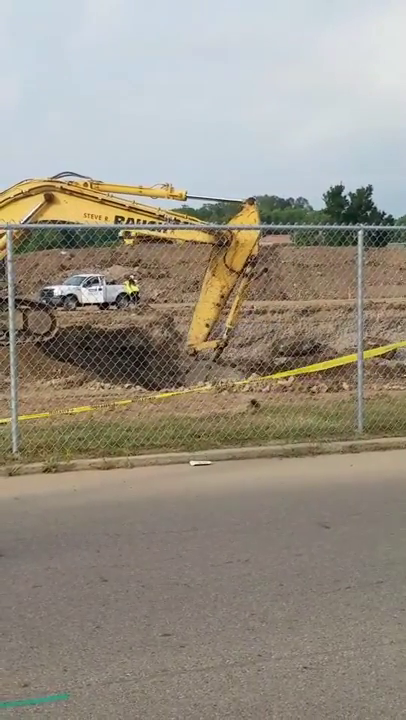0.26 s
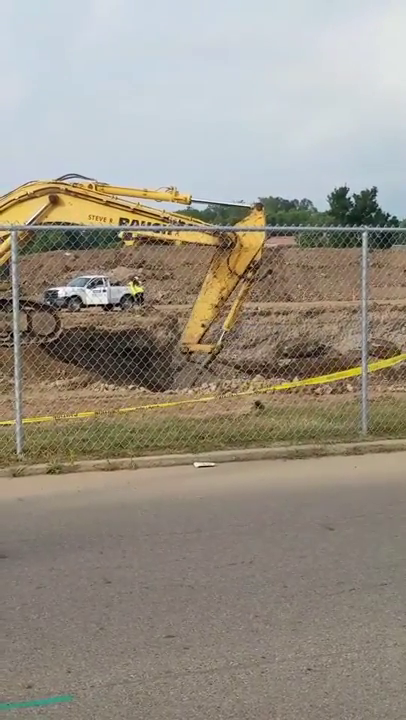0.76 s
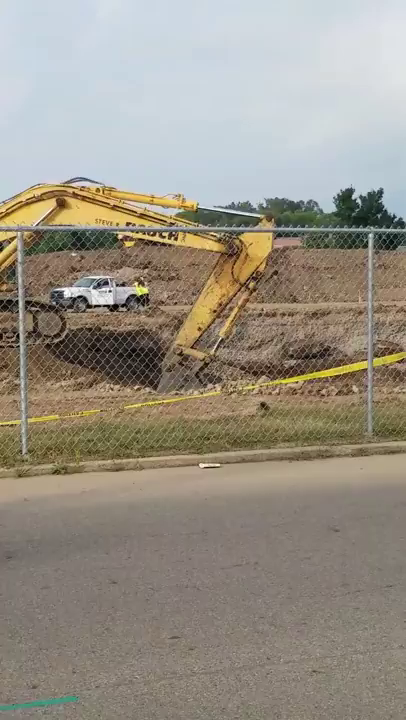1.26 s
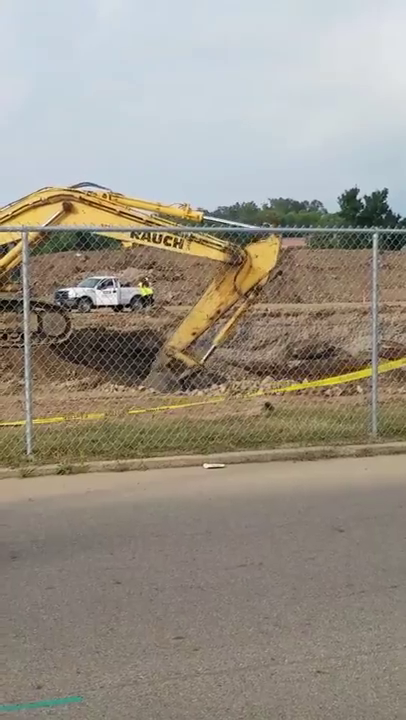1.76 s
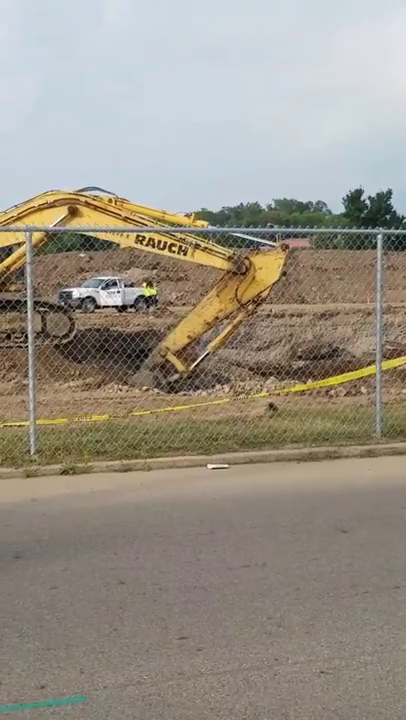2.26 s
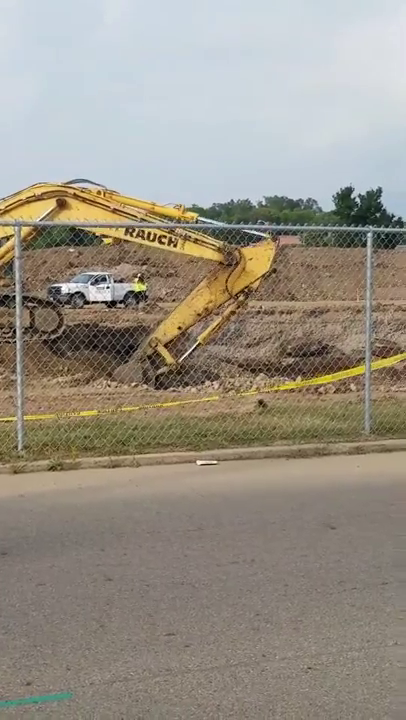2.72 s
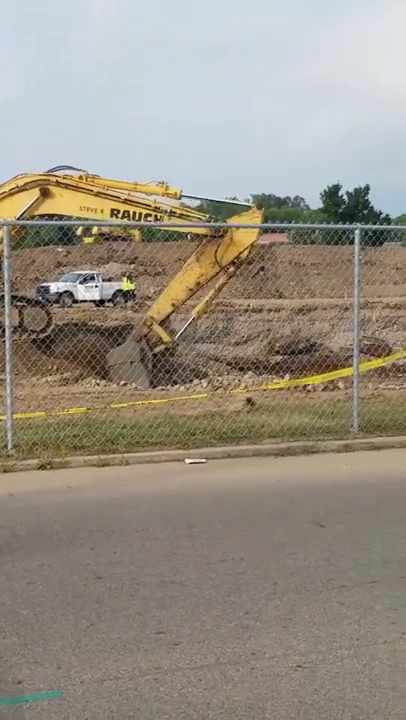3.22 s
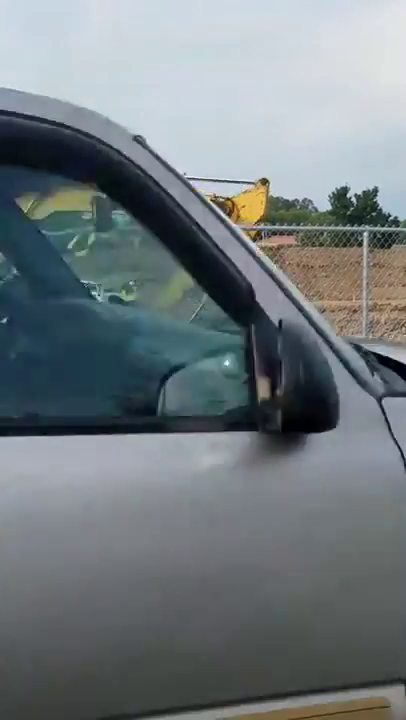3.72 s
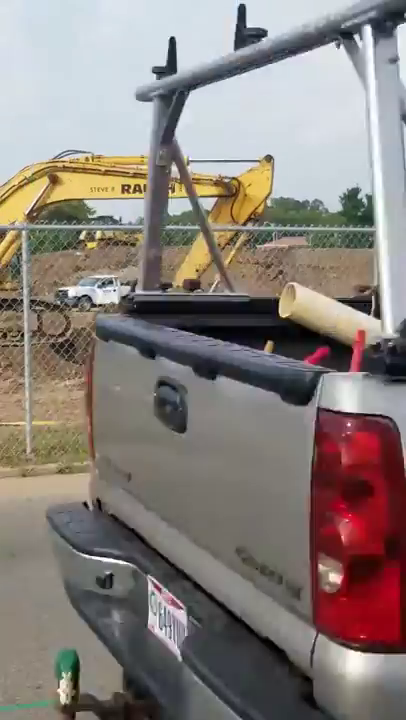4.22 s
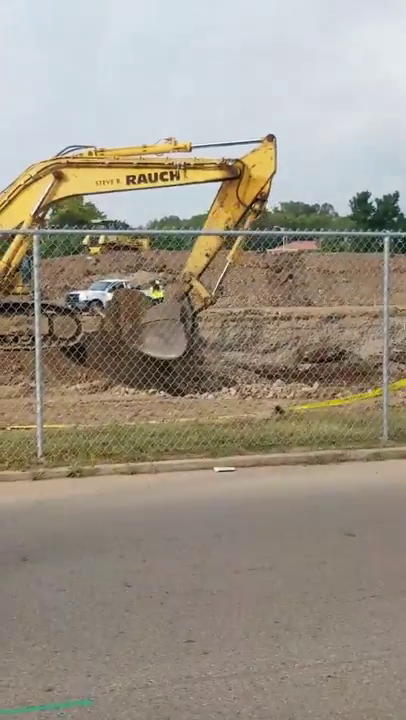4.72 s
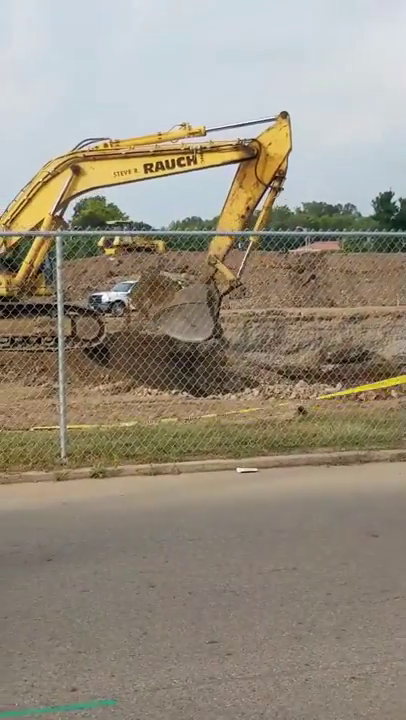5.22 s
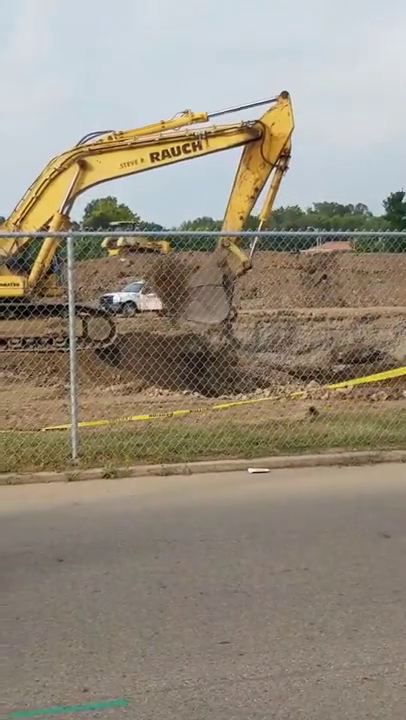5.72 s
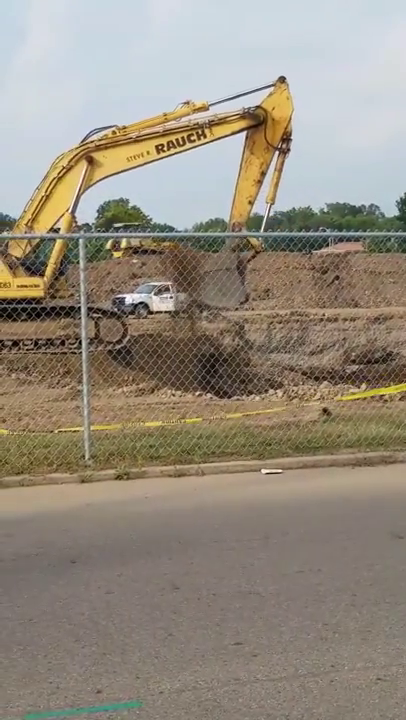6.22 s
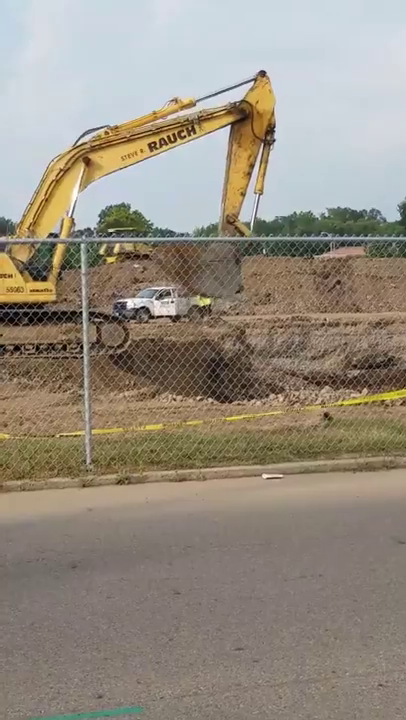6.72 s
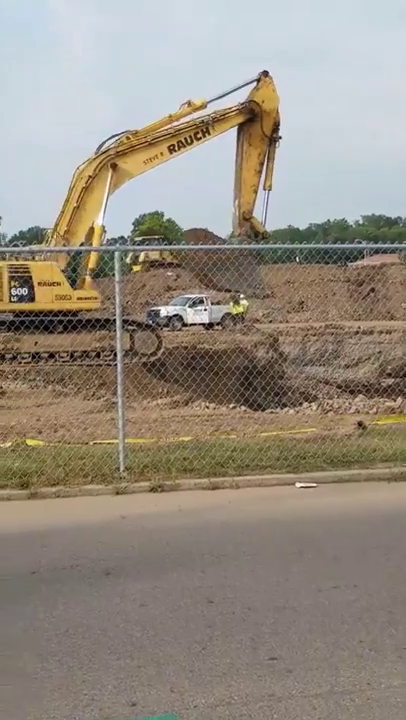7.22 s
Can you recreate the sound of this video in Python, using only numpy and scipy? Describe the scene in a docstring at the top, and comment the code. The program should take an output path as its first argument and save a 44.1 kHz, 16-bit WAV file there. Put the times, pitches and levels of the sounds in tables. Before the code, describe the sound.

Outdoors by a road, a large diesel excavator dominates with a loud, nearly pure low drone, plus fan roar, faint knock and oil hiss. Breeze rumbles on the microphone. The engine sags, then surges as its load frees. A pickup passes very close from left to right, its tyres roaring on coarse asphalt and briefly masking the machine. Afterwards the drone returns softer, with brighter roar and hiss.

```python
"""From the start a big diesel excavator digs behind a fence: its exhaust drones on one low note over fan
roar, knock, turbo and hydraulics; a second engine hums farther off and a breeze rumbles on the microphone.
Freed of its load the engine surges, then a pickup rolls by a few steps away and screens the machine for
a moment, while the upper body swings round; later comes one faint tick.
Tones are summed sines that waver; roars and hisses are coloured noise; whistles are narrow noise bands."""
import sys
import numpy as np
from scipy import signal
from scipy.fft import rfft, irfft, next_fast_len
from scipy.io import wavfile
from scipy.ndimage import uniform_filter1d

SR = 44100
rng = np.random.default_rng(int(sys.argv[2]) if len(sys.argv) > 2 else 0)


def wav_out(sig):
    """Save sig, one row per channel (or a flat mono array), as 16-bit PCM at SR to the path in sys.argv[1]."""
    wavfile.write(sys.argv[1], SR, np.round(np.clip(np.atleast_2d(sig).T, -1, 1) * 32767).astype(np.int16))


N = 329427
TIME = np.arange(N) / SR


def from_db(db):
    """Decibels to gain."""
    return 10 ** (np.asarray(db) / 20)


def rms_one(x):
    """Scale to unit power."""
    return x / np.sqrt(np.mean(x ** 2) + 1e-20)


def in_time(rows):
    """Each column of a curve table at every sample."""
    time_s, *columns = np.transpose(rows)
    return [np.interp(TIME, time_s, column) for column in columns]


def at_hz(points, hz):
    """Read a table on a log-frequency axis."""
    known_hz, values = np.transpose(points)
    return np.interp(np.log(hz + 1), np.log(known_hz), values)


def pan(left_db):
    """Gains of the two channels, left_db apart; negative leans right."""
    return from_db(np.array([[left_db], [-left_db]]) / 2)


def swell(at_s, half_length_s):
    """A smooth bump of height 1, down to 1/e at the half length."""
    return np.exp(-((TIME - at_s) / half_length_s) ** 2)


def drift(rate_hz):
    """Slow chance of spread 1: noise smoothed twice."""
    step = 40  # samples between slow values
    pole = np.exp(-2 * np.pi * rate_hz * step / SR)
    chance = rng.standard_normal(N // step + 2002)
    # the first 2000 values let the smoothing settle
    slow = signal.lfilter([1], [1, -2 * pole, pole * pole], chance)[2000:]
    return np.interp(np.arange(N) / step, np.arange(len(slow)), rms_one(slow))


# how alike the two microphone channels hear a wide sound: hz, likeness (0 to 1)
LIKENESS = [(60, 0.69), (200, 0.92), (400, 0.93), (1300, 0.81), (2400, 0.59), (4400, 0.099), (7000, 0),
            (15000, 0)]


def noise(spectrum, likeness=LIKENESS):
    """Stereo noise of a given colour, its channels as alike at each pitch as the likeness says; rms 1."""
    size = next_fast_len(N, True)
    hz = np.arange(size // 2 + 1) * SR / size
    mid, side = rfft(rng.standard_normal((2, size)))
    alike = np.clip(at_hz(likeness, hz), -1, 1)
    both = np.sqrt(1 + alike) * mid + np.sqrt(1 - alike) * side * [[1], [-1]]
    # beyond its first and last points the spectrum falls away
    below = 1 + (.7 * spectrum[0][0] / (hz + 1)) ** 6
    above = 1 + (.7 * hz / spectrum[-1][0]) ** 6
    colour = from_db(at_hz(spectrum, hz)) / np.sqrt(below * above)
    return rms_one(irfft(both * colour, size)[:, :N])


def whistle(hz, width_hz):
    """A narrow band of turbulence around a centre that may move; rms 1."""
    white = rng.standard_normal((2, 2, N))
    lowpass = signal.butter(2, width_hz / 2, fs=SR, output="sos")
    in_phase, quadrature = signal.sosfilt(lowpass, white)
    angle = 2 * np.pi * np.cumsum(hz * np.ones(N)) / SR
    return rms_one(in_phase * np.cos(angle) + quadrature * np.sin(angle))


GROUND_DELAY_S, GROUND_SHARE = 0.00066, 0.24


def off_the_ground(x, dull_hz):
    """A dull ground echo just behind the direct sound carves notches into it; rms 1."""
    dull = signal.sosfiltfilt(signal.butter(1, dull_hz, fs=SR, output="sos"), x)
    echo = np.array([np.interp(TIME - GROUND_DELAY_S, TIME, channel) for channel in dull])
    return rms_one(x + GROUND_SHARE * echo)


# the governed speed in firings per s, and its sag while digging and further with the bucket full
GOVERNED_HZ, DIG_SAG_HZ, FULL_SAG_HZ = 166.5, 1.0, 3.1
# the bucket bites deeper, starts to break out of the soil, and is free
BITE_S, BREAKOUT_S, FREE_S = 1.6, 2.65, 3.0
# the overshoot once free; the governor's hunting, at all times but the heaviest load, most after release
SURGE_HZ, SETTLE_S, HUNT_HZ, SURGE_HUNT_HZ, HUNT_PERIOD_S = 3.0, 1.0, .75, 1.5, .74


def engine_speed():
    """Firings per second: load drags the engine down, release lets it overshoot, the governor hunts."""
    digging = np.interp(TIME, [BREAKOUT_S, FREE_S], [1, 0])
    filling = np.interp(TIME, [BITE_S, BREAKOUT_S], [0, 1])
    sag = digging * (DIG_SAG_HZ + FULL_SAG_HZ * filling)
    surge = (1 - digging) * np.exp(-np.maximum(TIME - FREE_S, 0) / SETTLE_S)
    hunt_depth = HUNT_HZ * (1 - digging * filling) + SURGE_HUNT_HZ * surge
    hunt = hunt_depth * np.cos(2 * np.pi * (TIME - FREE_S) / HUNT_PERIOD_S)
    return GOVERNED_HZ - sag + SURGE_HZ * surge + hunt


# the upper body swings round: start_s, end_s
SWING_S = (3.6, 4.7)


def swung():
    """How far the upper body has turned, 0 to 1."""
    return np.interp(TIME, SWING_S, [0, 1])


# exhaust note while digging, then while lifting, before shadow and flutter: time_s, level_db
DRONE_DIGGING = [(0.22, -7.5), (0.79, -7.5), (2.4, -8), (3.04, -10), (3.3, -15)]
DRONE_LIFTING = [(4.4, -15), (5.44, -15.5), (6.3, -13), (7.4, -15)]
# parts of the pickup that block the exhaust note: middle_s, half_length_s, loss_db
SHADOWS = [(3.545, 0.12, -7), (3.867, 0.084, -15), (4.307, 0.051, -3.5)]
# exhaust overtones from the second up, at governed speed:
# digging_level_db, swung_level_db, gain_db_per_hz (of engine speed)
OVERTONES = [(-33.5, -33.5, 0.4), (-46, -40.5, 1.5), (-45, -39.5, 0.9)]


def exhaust(turns, firing_hz, flutter_db=0.82, waver_rad=0.03,
            overtone_flutter_db=1.0, scatter_rad=0.12, overtone_shadow_db=-14):
    """Firing pulses boom almost as a pure sine; moving air wavers the overtones; the pickup shadows both."""
    drone_db, = in_time(np.vstack([DRONE_DIGGING, DRONE_LIFTING]))
    shadow_db = sum(db * swell(at_s, half_s) for at_s, half_s, db in SHADOWS)
    note_db = drone_db + shadow_db + flutter_db * drift(14)
    note = from_db(note_db) * np.cos(2 * np.pi * turns + waver_rad * drift(12))

    hidden_db = overtone_shadow_db * swell(at_s=3.86, half_length_s=0.24)
    for multiple, (digging_db, swung_db, db_per_hz) in enumerate(OVERTONES, 2):
        facing_db = digging_db + swung() * (swung_db - digging_db)
        level_db = facing_db + db_per_hz * (firing_hz - GOVERNED_HZ) + hidden_db
        angle = 2 * np.pi * multiple * turns + scatter_rad * drift(4.5)
        note = note + from_db(level_db + overtone_flutter_db * drift(3.7)) * np.cos(angle)
    return np.sqrt(2) * note * pan(-.9)  # the root makes the levels rms


# colour of the exhaust boom: hz, relative_db
BOOM = [(25, -33.5), (55, -17), (90, -10), (200, -2), (300, 0), (360, -5.5), (430, -18), (800, -48.5)]
BOOM_DB = -27  # while digging, before drift and screening


def exhaust_boom(swung_boom_db=-1.1):
    """Turbulent gas leaving the stack, heard almost alike in both channels."""
    level_db = BOOM_DB + swung_boom_db * swung() + 0.81 * drift(6.6)
    return from_db(level_db) * noise(BOOM, likeness=[(80, 0.91), (300, 1.0)])


# colour of the fan and block before the ground echo: hz, relative_db
ROAR = [(200, -20), (330, 1.5), (430, 0.5), (620, 3.5), (760, -6), (900, -0.5), (1150, -2.5), (1400, -5),
        (1700, -10), (2300, -10), (3000, -18.5), (4400, -20.5), (6000, -35.5), (9000, -48)]


def machine(turns, roar_db, knock=.11, knock_hz=1400, uneven=.3, patchy_db=0.66):
    """Fan and block roar; above the knock edge it pulses with each firing of six unequal cylinders."""
    roar = off_the_ground(noise(ROAR), dull_hz=3380) * from_db(patchy_db * drift(28))
    bright = signal.sosfiltfilt(signal.butter(2, knock_hz, "high", fs=SR, output="sos"), roar)
    strengths = 1 + uneven * rng.standard_normal(size=6)
    cylinder = strengths[turns.astype(int) % 6]
    knocking = knock * cylinder * np.sin(2 * np.pi * turns) * bright
    return from_db(roar_db) * (roar + knocking) * pan(-2.3)


# bands in which the engine housing resonates, levels against the roar level:
# pitch_hz, width_hz, digging_db, swung_db
HOUSING = [(883.5, 136, -8, -8), (1106, 280, -20.5, -6), (2390, 160, -29, -33)]


def housing(roar_db):
    """Panels and louvres colour the roar; the colour changes as the upper body swings round."""
    out = 0
    for hz, width_hz, digging_db, swung_db in HOUSING:
        facing_db = digging_db + swung() * (swung_db - digging_db)
        out = out + from_db(roar_db + facing_db) * whistle(hz, width_hz)[0]
    return out * pan(-.8)


# colour of the oil hiss: hz, relative_db
HISS = [(2500, -8.5), (4500, 4), (6300, -1), (7400, -4.5), (8700, 0.5), (10100, -3), (11100, 0.5),
        (12600, -0.5), (14300, 2), (15800, -1)]
# oil squeezing through a valve: middle_s, half_length_s, pitch_hz, width_hz, level_db (before screening)
VALVES = [(1.74, .4, 9070, 600, -53.5), (5.8, 0.41, 3900, 590, -50), (7.1, .3, 10000, 1600, -58),
          (7.2, 0.48, 6800, 500, -55)]


def hydraulics(hiss_db, trim_db=6.0, turned_away_db=-3.5, beam_hz=11000):
    """Oil hiss rises and falls with the work, its very top beamed away in the swing; valves rush narrowly."""
    hiss = noise(HISS)
    top = signal.sosfiltfilt(signal.butter(4, beam_hz, "high", fs=SR, output="sos"), hiss)
    beamed = hiss + (from_db(turned_away_db * swung()) - 1) * top
    out = from_db(hiss_db + trim_db) * beamed
    for at_s, half_s, hz, width_hz, db in VALVES:
        out = out + from_db(db) * swell(at_s, half_s) * whistle(hz, width_hz)
    return out * pan(-.5)


# turbocharger whistle before flutter: time_s, level_db
TURBO = [(0, -55.5), (1.1, -53), (2.0, -60.5), (2.8, -63.5), (4.0, -63), (5.5, -62), (6.3, -61), (7.4, -57)]
# the turbine spools up to its working pitch, and rises when the smoothed engine speed passes governed
TURBO_HZ, SPOOL_HZ, SPOOL_S, TURBO_HZ_PER_HZ, TURBO_SMOOTH_S = 14635, 420, 1.4, 45, .74


def turbo(firing_hz, flutter_db=-0.5, lower_db=-13.0):
    """A thin whistle climbs as the turbine spools up, with a fainter order at three quarters of its pitch."""
    level_db, = in_time(TURBO)
    drive_hz = uniform_filter1d(firing_hz - GOVERNED_HZ, size=int(TURBO_SMOOTH_S * SR))
    spooling_hz = TURBO_HZ - SPOOL_HZ * np.exp(-TIME / SPOOL_S)
    hz = spooling_hz + TURBO_HZ_PER_HZ * np.maximum(drive_hz, 0)
    tones = whistle(hz, width_hz=80) + from_db(lower_db) * whistle(hz * 3 / 4, width_hz=100)
    return from_db(level_db + flutter_db * drift(6)) * tones


# second engine, farther off, before flutter: time_s, firing_level_db, octave_level_db
FAR_ENGINE = [(0, -33.5, -50.5), (2.1, -30.5, -45.5), (3.6, -49.5, -42.5), (4.2, -49, -36),
              (6.0, -45, -32.5), (6.9, -36, -34)]
FAR_FIRING_HZ = 88.4


def far_engine(flutter_db=2.5):
    """Another diesel at nearly constant speed; its firing tone and the octave above carry this far."""
    low_db, high_db = in_time(FAR_ENGINE)
    angle = 2 * np.pi * np.cumsum(FAR_FIRING_HZ + .25 * drift(2.7)) / SR
    low = from_db(low_db + flutter_db * drift(5)) * np.sin(angle)
    high = from_db(high_db + flutter_db * drift(3)) * np.sin(2 * angle)
    return np.sqrt(2) * (low + high)


# colour of wind rumble on the microphone: hz, relative_db
WIND = [(18, -22.5), (35, -10), (60, -2.5), (100, 2.5), (160, -3.5), (250, -5.5), (400, -24), (900, -44)]
# gusts before their lumps: strongest_s, half_length_s, level_db
GUSTS = [(0.767, 0.17, -22), (1.35, 0.2, -25), (1.97, 0.33, -20.5), (2.655, 0.3, -18), (3.673, 0.067, -33),
         (4.338, 0.29, -31.5), (5.54, 0.22, -27), (6.984, .16, -31)]
# the light air between gusts: level at first, and its fall
LULL_DB, LULL_FALL_DB_PER_S = -30.5, 0.93
THUMP_S, THUMP_DB = 2.6, -14


def breeze(lumpy_db=1.0, eddy_db=2.0):
    """Gusts rise from light air, eddies buffet each microphone port; the strongest lands with a thump."""
    lull = from_db(LULL_DB - LULL_FALL_DB_PER_S * TIME)
    flow = lull + sum(from_db(db) * swell(at_s, half_s) for at_s, half_s, db in GUSTS)
    # eddies shared by both ports, and lumps at each port alone
    lumps_db = eddy_db * drift(7.4) + lumpy_db * np.array([drift(12), drift(21)])
    thump = from_db(THUMP_DB) * swell(THUMP_S, half_length_s=0.009)
    force = flow * from_db(lumps_db) + thump
    return force * noise(WIND, likeness=[(30, 0.0081), (300, 0.084)]) * pan(1.0)


# colours of tyre roar and tyre hiss: hz, relative_db
TYRES = [(50, -15.5), (120, -2), (300, -8.5), (500, 1.5), (750, -1), (950, -0.5), (1400, -6.5), (2000, -14),
         (3000, -17.5), (5000, -30), (9000, -49.5)]
TYRE_HISS = [(1500, 0), (3000, 5.5), (5000, 6), (7000, 0), (10000, -5.5), (15800, 1)]
# the pickup's axles, levels when nearest before flutter and sweep:
# nearest_s, half_length_s, roar_level_db, hiss_level_db
PICKUP = [(3.472, 0.5, -26.5, -39.5), (4.138, 0.5, -27.5, -46)]


def pickup(sweep_db=1.0, lag_s=0.00019, coarse_db=1.64):
    """Front and rear axle each swell and fade with distance, their treads drumming on coarse asphalt."""
    # from close by and low down the sound reaches one microphone port later than the other
    left_time = TIME - lag_s * swell(at_s=3.97, half_length_s=0.76)
    out = 0
    for at_s, half_s, roar_db, hiss_db in PICKUP:
        along = (TIME - at_s) / half_s
        nearness = 1 / np.sqrt(1 + along ** 2)
        tread = noise(TYRES, likeness=[(300, .93), (5000, 0.55)])
        roar = from_db(roar_db + coarse_db * drift(32)) * nearness ** 1.72 * tread
        # the hiss is beamed sideways and so dies away faster than the roar
        sizzle = noise(TYRE_HISS, likeness=[(2000, 0.53), (9000, .15)])
        hiss = from_db(hiss_db) * nearness ** 2.9 * sizzle
        # it crosses from left to right
        sweep = from_db(sweep_db * along * nearness * np.array([[-1], [1]]))
        left, right = (roar + hiss) * sweep
        out = out + np.array([np.interp(left_time, TIME, left), right])
    return out


def pickup_fan(level_db=-24.0):
    """The radiator fan whooshes briefly, as a band of turbulence, as the grille goes by."""
    return from_db(level_db) * swell(at_s=3.49, half_length_s=0.025) * whistle(hz=986, width_hz=270)


def tick(level_db=-41):
    """One faint, very high tick: a very short burst of band noise."""
    return from_db(level_db) * swell(at_s=6.039, half_length_s=.002) * whistle(hz=13400, width_hz=4000)


# the machine's work, before the roar and hiss trims and the screening: time_s, roar_db, hydraulic_hiss_db
WORK = [(0, -30.5, -49.5), (.7, -31, -52.5), (1.05, -30.5, -50.5), (1.75, -32, -51), (2.75, -34.5, -56),
        (3.2, -29.5, -50), (3.65, -26.5, -40.5), (4.0, -31, -45), (4.95, -30, -51), (5.75, -27.5, -48),
        (6.2, -28, -49.5), (6.75, -28.5, -47.5), (6.97, -27, -44), (7.45, -27, -47.5)]


def scene(screen_db=-7.5, roar_trim_db=2.5):
    """The excavator, its body dimmed while the pickup stands in between, and everything around."""
    firing_hz = engine_speed()
    turns = np.cumsum(firing_hz) / SR  # firings so far
    roar_db, hiss_db = in_time(WORK)
    screen = from_db(screen_db * swell(at_s=3.75, half_length_s=0.44))
    body = exhaust_boom() + machine(turns, roar_db + roar_trim_db) + housing(roar_db) + hydraulics(hiss_db)
    # the exhaust note has shadows of its own
    excavator = exhaust(turns, firing_hz) + screen * body + turbo(firing_hz)
    return excavator + far_engine() + breeze() + pickup() + pickup_fan() + tick()


CUTOFF_HZ = 15800


def record(dry):
    """The sound opens softly, its highest peaks are rounded and the top is cut steeply."""
    opening = np.minimum(TIME / .004, 1)
    rounded = dry / (1 + (dry / .98) ** 10) ** .1
    top_cut = signal.ellip(10, .1, 80, CUTOFF_HZ, fs=SR, output="sos")
    return signal.sosfilt(top_cut, opening * rounded)


dry = scene()
out = record(dry)
wav_out(out)
```